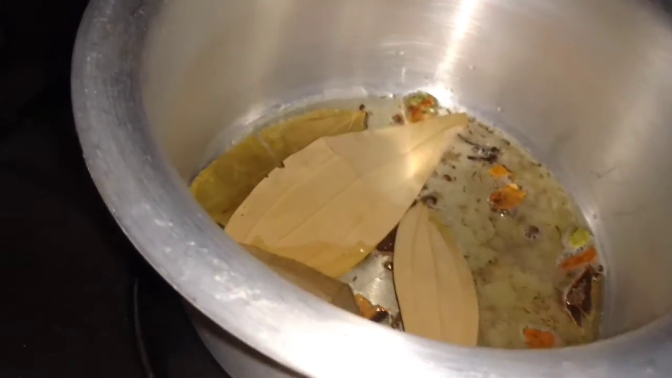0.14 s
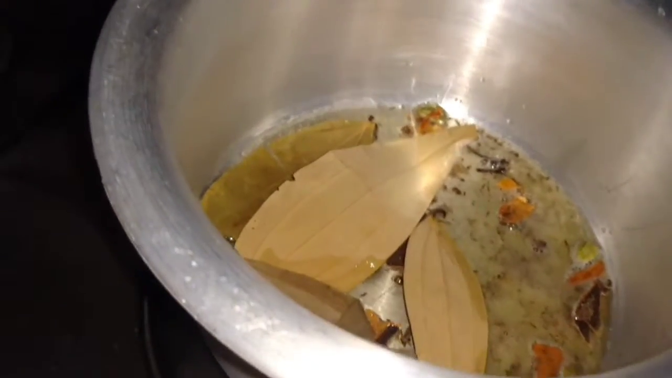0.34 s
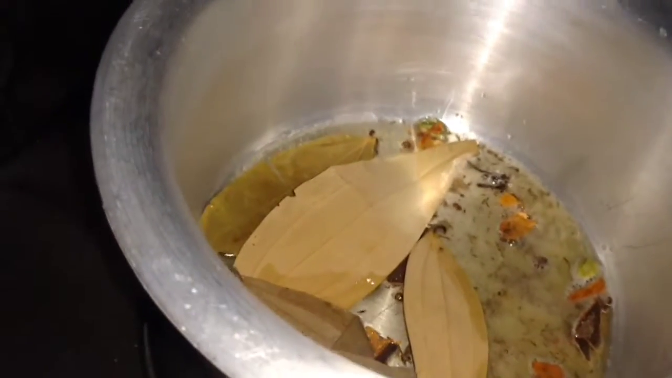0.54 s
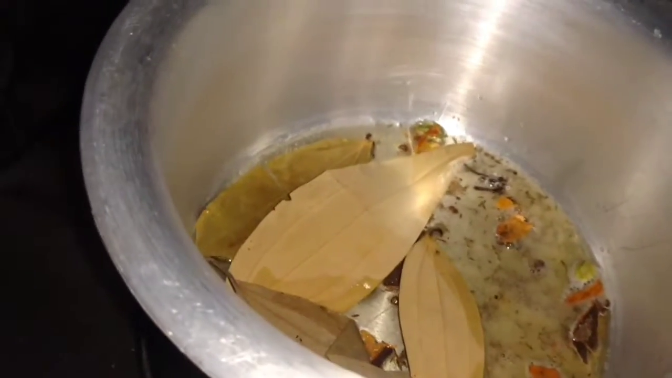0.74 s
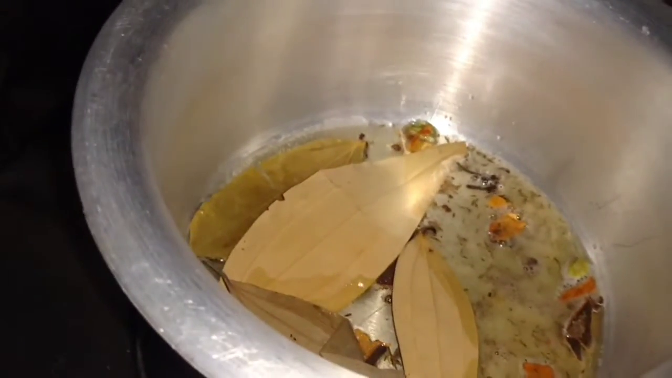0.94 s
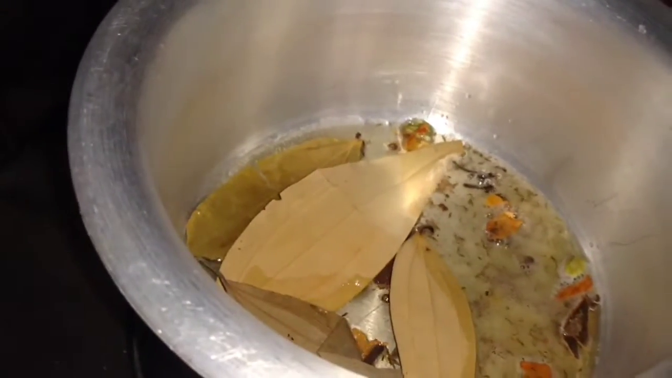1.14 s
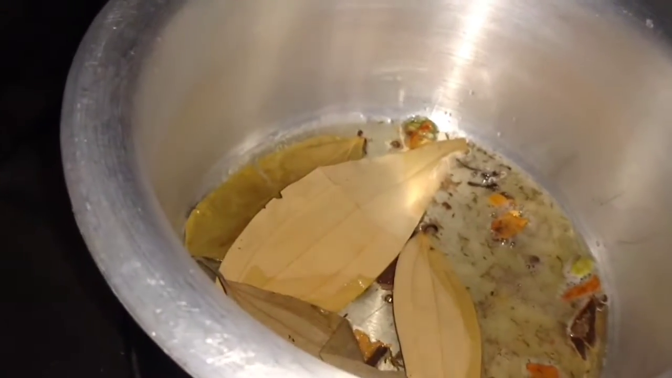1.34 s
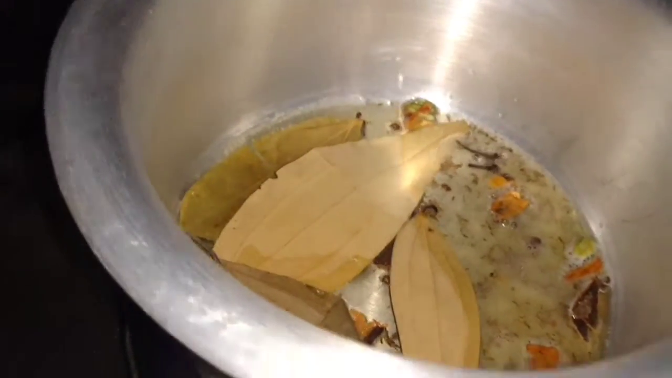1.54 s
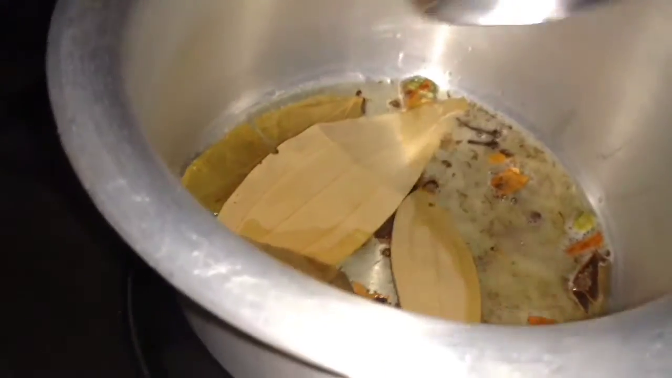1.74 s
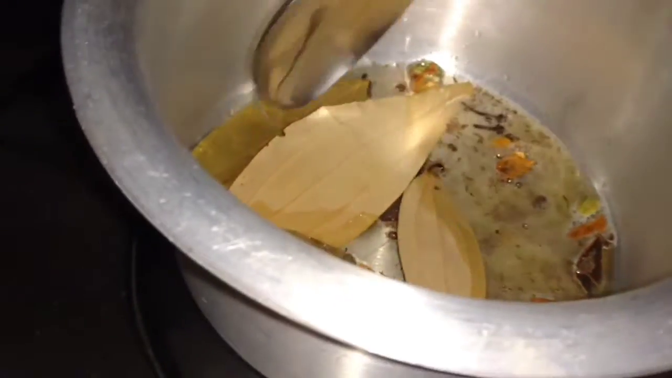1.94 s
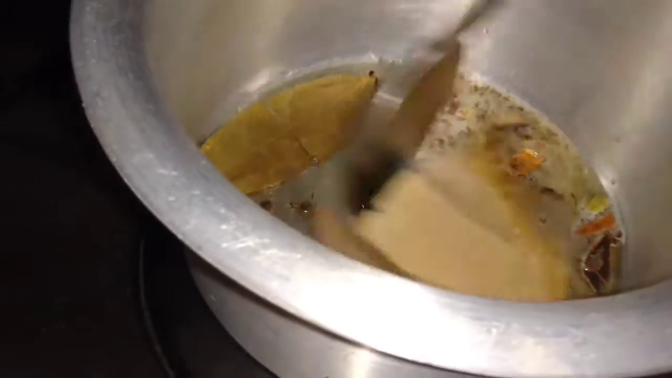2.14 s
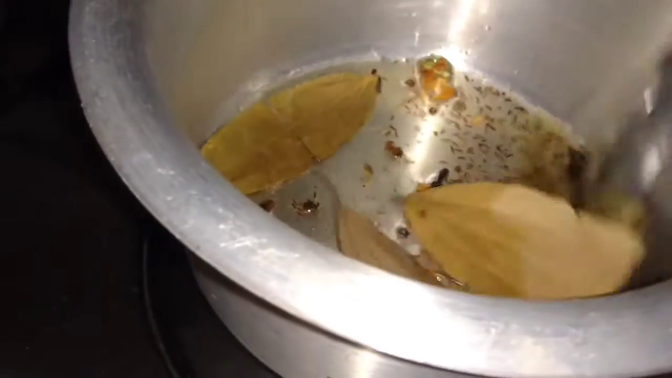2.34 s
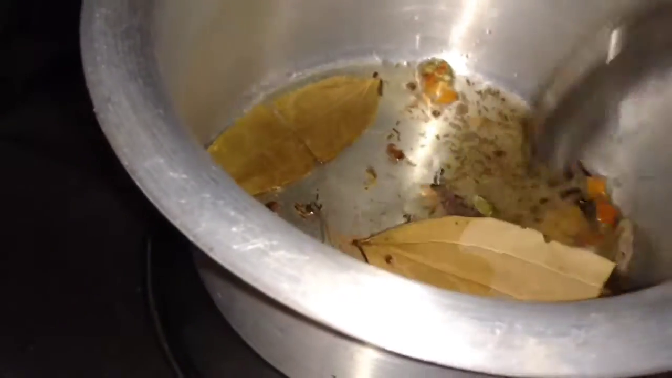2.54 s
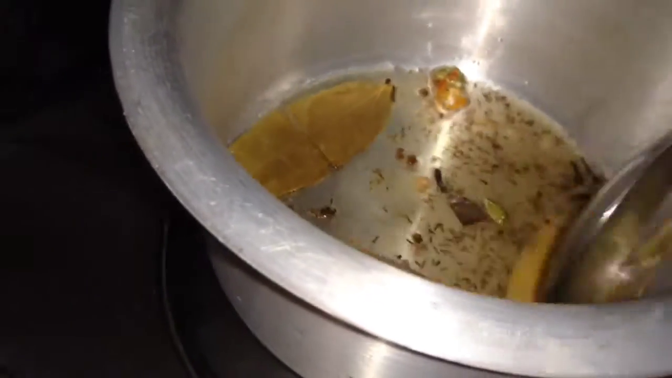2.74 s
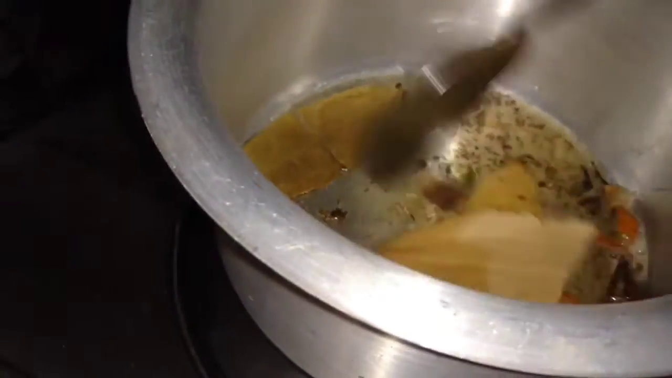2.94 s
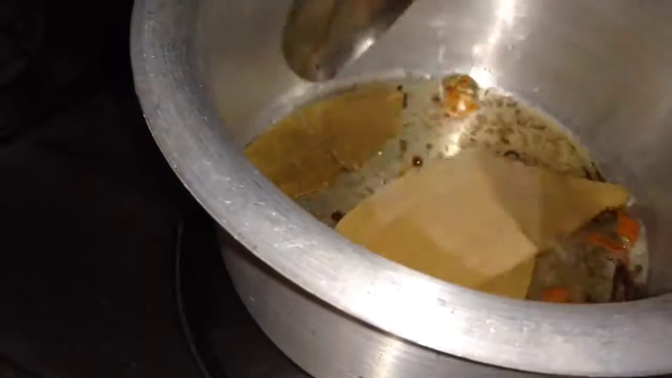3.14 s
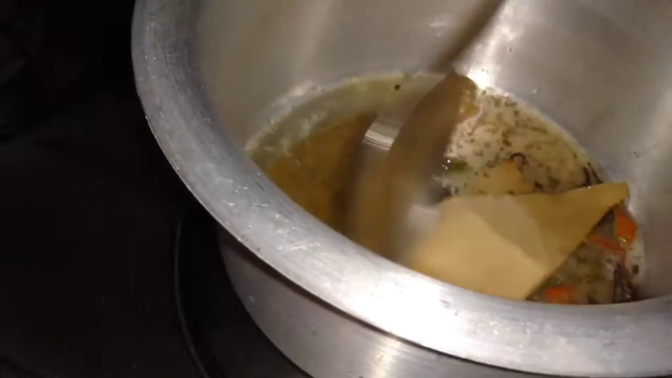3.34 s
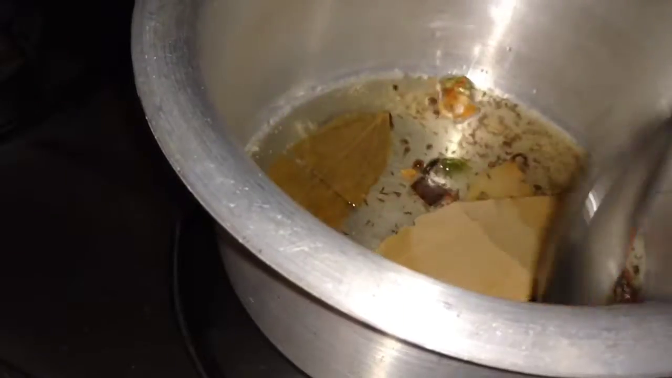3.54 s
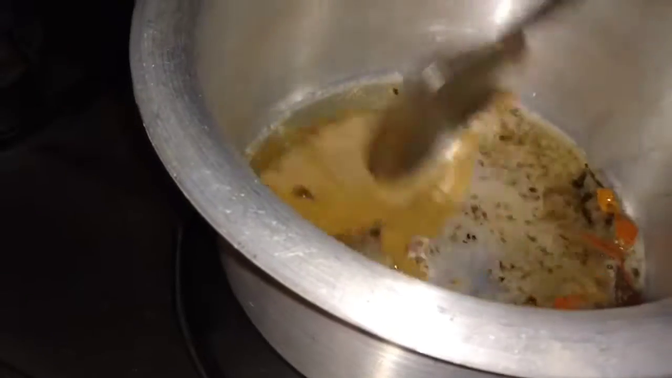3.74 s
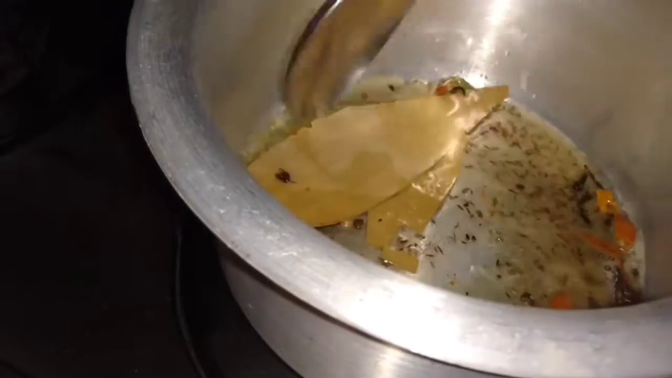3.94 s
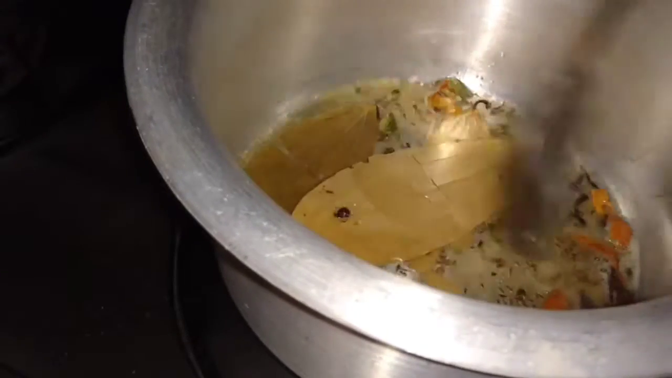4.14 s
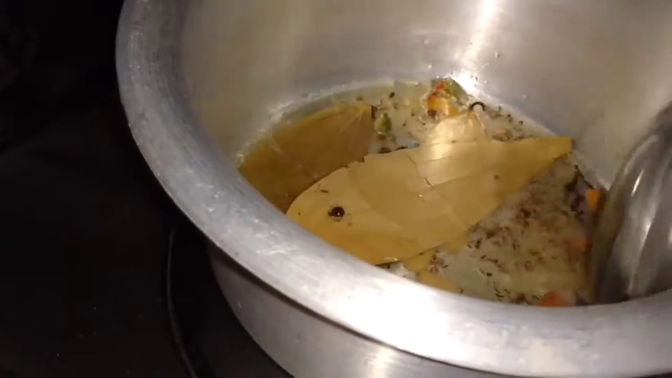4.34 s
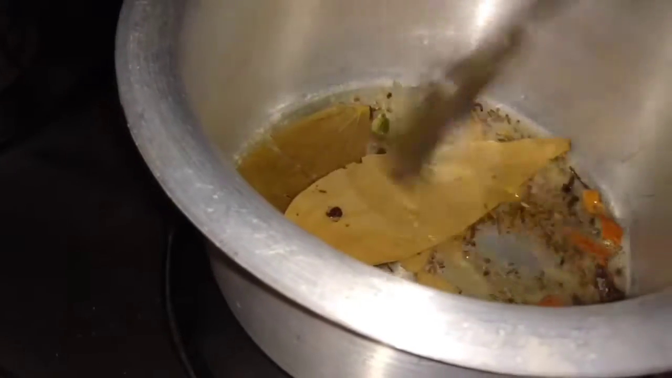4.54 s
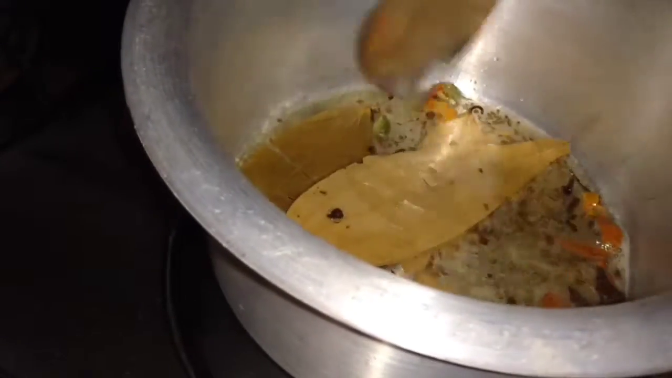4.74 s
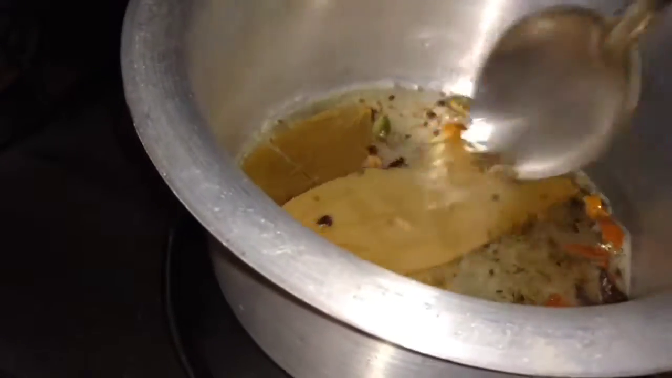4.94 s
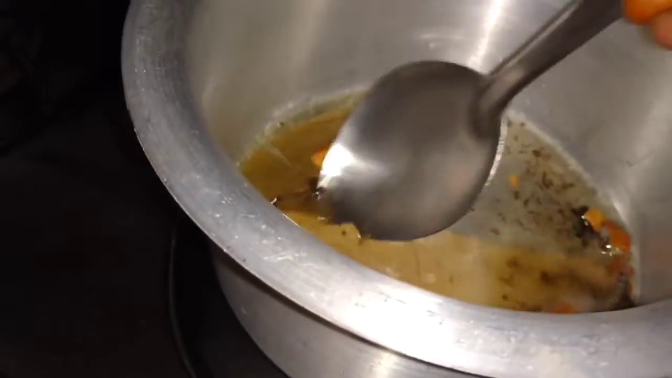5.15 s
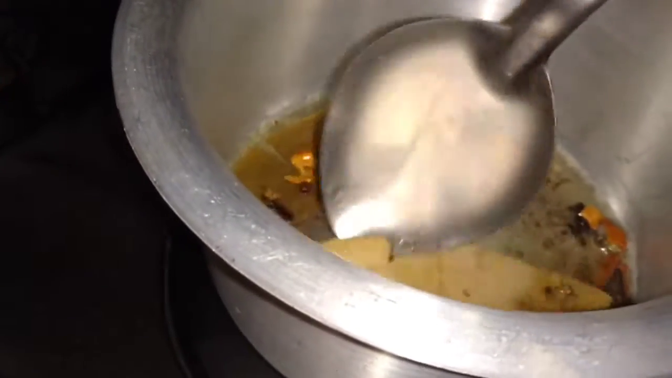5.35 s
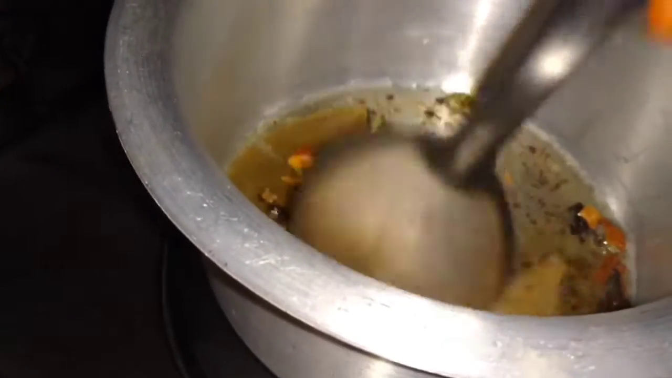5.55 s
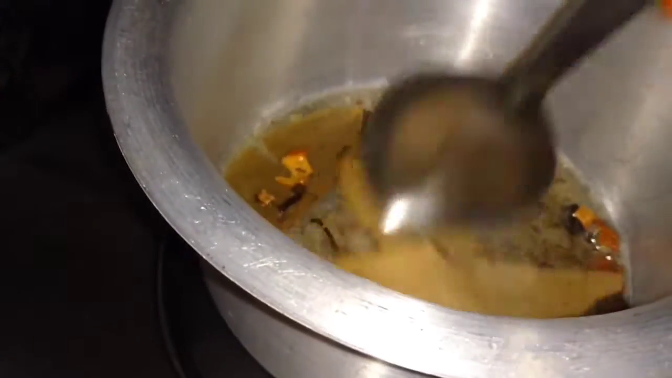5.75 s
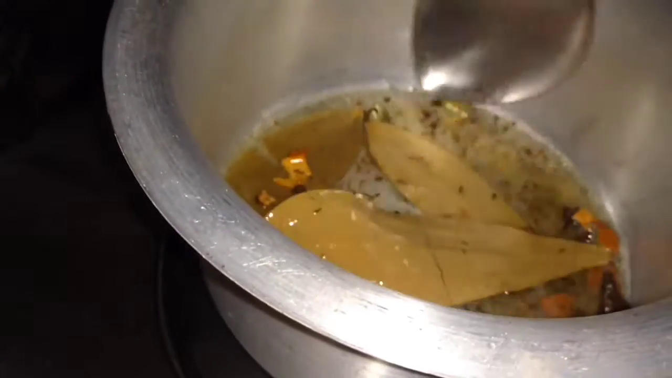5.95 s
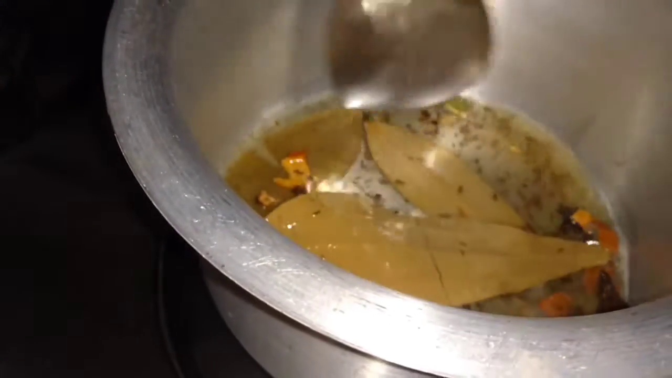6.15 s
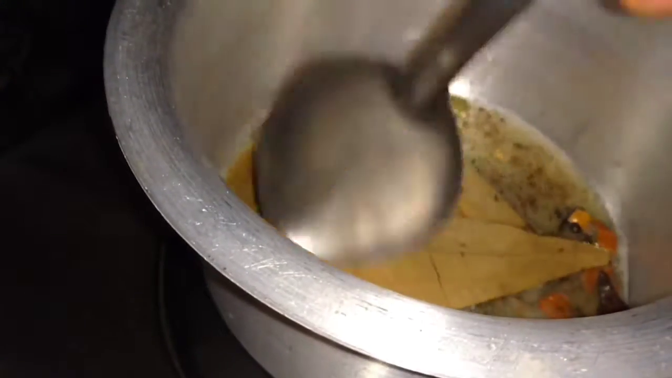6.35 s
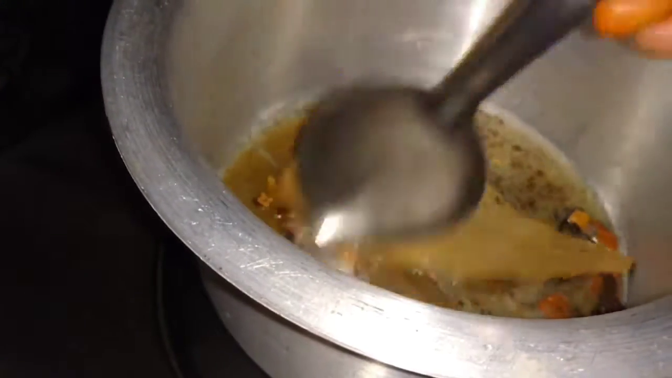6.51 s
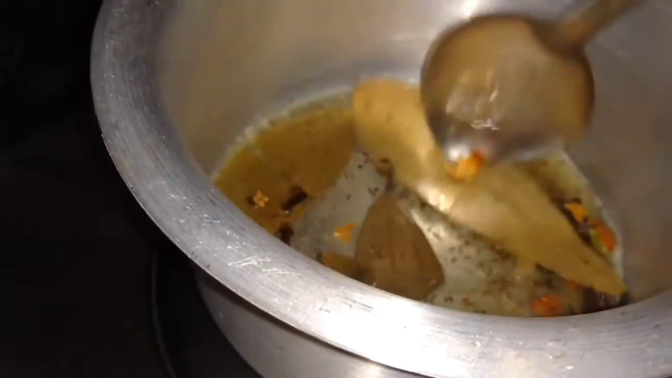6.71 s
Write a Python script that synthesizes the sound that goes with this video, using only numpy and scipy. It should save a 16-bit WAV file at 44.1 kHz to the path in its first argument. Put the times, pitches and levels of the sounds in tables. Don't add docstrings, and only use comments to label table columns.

```python
import sys
import numpy as np
from scipy import signal
from scipy.fft import rfft, irfft, next_fast_len
from scipy.io import wavfile
from scipy.ndimage import uniform_filter1d, minimum_filter1d, map_coordinates

SR = 44100
rng = np.random.default_rng(int(sys.argv[2]) if len(sys.argv) > 2 else 0)


def materialize(psi):
    bounded = np.clip(np.atleast_2d(psi).T, -1, 1)
    quanta = np.round(bounded * 32767).astype(np.int16)
    wavfile.write(sys.argv[1], SR, quanta)


def how_loud(loudness_db):
    steps = np.asarray(loudness_db, float) / 20
    return 10 ** steps


N = 298998

# (centre [Hz], width [Hz], level [dB])
FLOOR_MODES = [(291, 20, -22), (365, 40, -25), (448, 10, -12), (457, 3.5, -19), (468, 30, -4)]
# (centre [Hz], width [Hz], level [dB])
BOWL_MODES = [(563, 177, -1.5), (565.3, 53, 4), (628.5, 3.8, -11), (805, 150, -17.5)]
# (centre [Hz], width [Hz], level [dB])
WALL_MODES = [(893.6, 9.6, -4), (971, 29, -0.5), (1000, 36, -9.5), (1239, 112, 0), (1307, 45, 2.5),
              (1640, 180, -9.5), (1930, 71, -7), (2505, 250, 0)]
# (centre [Hz], width [Hz], level [dB])
EDGE_MODES = [(2420, 440, 1), (2764, 130, 0.5), (3587, 240, 6), (3670, 1010, 5), (5150, 1040, -1.5),
              (6100, 830, -5.5), (7200, 400, 1), (9000, 1100, -9.5), (12300, 7700, -16.5)]
PARTS = (FLOOR_MODES, BOWL_MODES, WALL_MODES, EDGE_MODES)
# (frequency [Hz], level [dB])
BODY_SHADOW = [(600, 0), (900, -2), (2000, 0), (4400, -4), (8200, -5), (9500, -2), (11000, 1.5), (15000, 2)]
PORT_SIDE = np.array([[0.5], [-0.5]])


def unit(x):
    return x / np.sqrt(np.mean(x ** 2) + 1e-20)


def along(points, hz):
    f, v = np.transpose(points)
    return np.interp(np.log(hz + 1), np.log(f + 1), v)


def curves(rows):
    s, *cols = np.transpose(rows)
    return np.array([np.interp(np.arange(N) / SR, s, c) for c in cols])


def wobble(rate_hz):
    knots = rng.standard_normal(int(N * rate_hz / SR) + 4)
    return map_coordinates(knots, [np.arange(N) * rate_hz / SR])


def filtered(x, response):
    m = next_fast_len(x.shape[-1] + 8192)
    return irfft(rfft(x, m) * response(np.fft.rfftfreq(m, 1 / SR)), m)[..., :x.shape[-1]]


def lowcut(f, hz):
    return (1j * f / (hz + 1j * f)) ** 2


def body(modes):
    def response(f):
        total = 0
        for k, (hz, width, db) in enumerate(modes):
            total = total + (-1) ** k * how_loud(db) * 1j * f * width / (hz * hz - f * f + 1j * f * width)
        return total
    return response


def add(track, s, piece):
    part = track[..., round(s * SR):][..., :piece.shape[-1]]
    part += piece[..., :part.shape[-1]]


def ports(pair, alike, gain):
    def mix(hz):
        turn = np.arccos(np.clip(along(alike, hz), 0, 1)) / 2
        return gain(hz) * np.array([np.cos(turn), np.sin(turn)])
    mid, side = filtered(pair, mix)
    return np.array([mid + side, mid - side])


def inside_pot(pair, wet_db):
    # (frequency [Hz], t60 [s])
    air_t60 = [(300, 0.09), (3000, 0.085), (12000, 0.011)]
    hz, t, z = signal.stft(rng.standard_normal((2, SR // 5)), SR, nperseg=128)
    decay = how_loud(-60 * t / along(air_t60, hz)[:, None])
    tail = signal.istft(z * decay, SR, nperseg=128)[1]
    tail = ports(tail, [(800, 0.4), (1800, 0.82)], lambda f: (f / (f + 1500)) ** 2)
    source = np.pad(pair.mean(0), (40, 0))[None]
    wet = signal.fftconvolve(source, tail / np.linalg.norm(tail[0]), axes=1)[:, :N]
    return pair + how_loud(wet_db) * wet


def rush(spectrum, grain_db, grain_hz):
    # (frequency [Hz], port likeness [0-1])
    likeness = [(60, 0.9), (400, 0.78), (1200, 0.042), (2000, 0.27), (15000, 0.18)]
    pair = rng.standard_normal((2, N)) * how_loud(grain_db * wobble(grain_hz))
    return unit(ports(pair, likeness, lambda hz: how_loud(along(spectrum, hz))))


def frying():
    # (time [s], level [dB])
    sizzle_levels = [(0.0, -53), (0.38, -51.5), (0.8, -45), (1.04, -50.5), (2.02, -45), (2.25, -56),
                     (2.74, -56.5), (3.08, -51), (3.74, -50), (4.2, -49.5), (4.38, -53.5), (4.55, -65.5),
                     (4.87, -65), (5.02, -54), (5.29, -58), (6.44, -49.5), (6.67, -45), (6.78, -40.5)]
    # (frequency [Hz], density [dB per Hz])
    fizz_spectrum = [(300, -30), (1500, -34), (2400, -1), (2900, -0.5), (4500, -5.5), (6500, -4),
                     (9000, -10), (12000, -13), (15300, -13.5), (16600, -45)]
    # (frequency [Hz], density [dB per Hz])
    burner_spectrum = [(120, -5.5), (220, -0.5), (350, 0.5), (450, -5), (600, -2), (900, -7), (1310, -2.5),
                       (1600, -7.5), (2500, -14), (5000, -38.5)]
    # (frequency [Hz], density [dB per Hz])
    rumble_spectrum = [(20, -38), (55, -6.5), (110, -2.5), (170, -3.5), (300, -40)]
    burner_db, burner_swing, rumble_db, rumble_swing = -4.5, 0.8, -11, 1.17
    swell_db = 1.2

    sizzle_db, = curves(sizzle_levels)
    mean_db = sizzle_db.mean()
    move_db = sizzle_db - mean_db
    sizzle = how_loud(sizzle_db + swell_db * wobble(8.3)) * rush(fizz_spectrum, grain_db=1.0, grain_hz=190)

    roar = rush(burner_spectrum, grain_db=swell_db / 2, grain_hz=8.8)
    roar = how_loud(mean_db + burner_swing * move_db + burner_db) * roar
    roar = roar + how_loud(-16.5) * np.std(roar) * unit(filtered(roar, body(WALL_MODES)))
    roar = roar + how_loud(-11.0) * np.std(roar) * unit(filtered(roar, body([(450, 7.9, 0)])))

    rumble = rush(rumble_spectrum, grain_db=3.5, grain_hz=7)
    return sizzle + roar + how_loud(mean_db + rumble_swing * move_db + rumble_db) * rumble


def pops():
    # (time [s], peak [dB], pitch [Hz], decay [cycles])
    bursts = [(0.0725, -16.5, 6250, 2.7), (0.3054, -32.5, 5340, 3.9), (0.4538, -24.5, 10300, 8.7),
              (0.4588, -29, 6100, 4.1), (0.6676, -20.5, 6570, 3.3), (0.6912, -23, 8900, 12.5),
              (1.0005, -26, 5560, 6.4), (1.1119, -23, 6430, 2.4), (1.333, -21.5, 6460, 2.4),
              (1.4356, -20, 6900, 1.1), (1.6823, -20, 5830, 4.3), (2.394, -32.5, 9000, 9),
              (2.428, -16, 5000, 1.3), (2.4893, -30.5, 6800, 1.8), (2.509, -33, 4120, 1.1),
              (2.9993, -27, 6100, 0.76), (3.3072, -22, 8700, 2.9), (3.3275, -15.5, 4840, 1.9),
              (3.569, -34, 5500, 1.6), (3.9586, -16, 6360, 6.9), (4.1692, -18.5, 5840, 7.8),
              (4.211, -24.5, 5300, 7.9), (4.6957, -60, 6330, 1.7), (4.81, -44, 6620, 1.6),
              (4.847, -26, 6700, 3.7), (5.523, -30.5, 8900, 2.4), (5.604, -32, 4600, 2.5),
              (5.6824, -29, 7060, 3.5), (6.054, -23, 6940, 4.7), (6.332, -34, 6570, 1.7),
              (2.1357, -9, 2830, 2.6), (1.527, -30, 3750, 1.6), (1.914, -30.5, 2930, 3.1),
             (2.547, -33.5, 3360, 3.2), (4.0299, -37, 3660, 4.3), (4.051, -28, 3080, 3.2),
             (4.1537, -26, 3600, 4.2), (4.1687, -20.5, 3620, 5), (4.1888, -34, 3560, 4),
             (4.5381, -45, 3600, 2.3), (4.5385, -49, 6200, 3), (5.893, -38, 2850, 4.4),
             (6.4178, -28, 3030, 6), (6.4427, -33, 2830, 12), (6.459, -31.5, 2960, 5.9),
             (6.6563, -32, 2920, 12), (6.676, -25, 3070, 5.5), (6.69, -30.5, 3040, 5.9),
             (6.7118, -30, 3080, 3.7), (6.7294, -25.5, 3120, 3.1),
              (0.2029, -79, 8690, 2),
        (0.565, -33.5, 10900, 8.9),
        (0.7667, -26.5, 10800, 6.2),
        (1.1707, -40, 9000, 3.2),
        (1.804, -31, 9400, 3.4),
        (1.847, -29, 9200, 3.8),
    ]
    out = np.zeros((2, N))
    for s, db, hz, cycles in bursts:
        lag_s = .35 / hz * rng.random((2, 1))
        t = np.maximum(np.arange(600) / SR - lag_s, 0)
        tone = np.sin(2 * np.pi * hz * t) * np.exp(-t * hz / max(cycles, .3)) * (1 - np.exp(-t * hz))
        click = .8 * rng.standard_normal(600) * np.exp(-t / .00025) * (t > 0)
        add(out, s, how_loud(db + 7.0) * (tone + click))
    return filtered(out, lambda f: lowcut(f, 1500) / (1 + 1j * f / 7800) ** 2)


def struck(modes, blows, crack_s, wash_s, low_hz, lasts_s):
    out, t = np.zeros((2, N)), np.arange(round(lasts_s * SR)) / SR
    for s, ring_db, crack_db, wash_db, damped_s in blows:
        touch_db = 60 * np.maximum(t + s - damped_s, 0) / 0.048
        ring = np.zeros((2, len(t)))
        for hz, db, t60, lead in modes:
            touch = 1 if hz > 700 else .015
            level_db = db - along(BODY_SHADOW, hz) * PORT_SIDE - 60 * t / t60 - touch * touch_db
            turns = hz * t + (hz > 2000) * rng.random() + lead * PORT_SIDE
            ring += how_loud(level_db) * np.sin(2 * np.pi * turns)
        crack = how_loud(crack_db - 60 * t / crack_s) * rng.standard_normal(len(t))
        wash = how_loud(wash_db - 60 * t / wash_s) * rng.standard_normal((2, len(t)))
        burst = filtered(crack + wash, lambda f: lowcut(f, low_hz) / (1 + 1j * f / 5000) ** 2)
        add(out, s, how_loud(ring_db) * ring + burst)
    return filtered(out, lambda f: lowcut(f, 150))


def rim_strike():
    # (frequency [Hz], level [dB], t60 [s], lead of first port [turns])
    strike_modes = [(624, -2, .7, -.03), (622.2, -17, 4, -.03), (620.2, -19, 1.4, .45), (1500, 19, .008, -.39),
                    (1460, 0, 1.07, -.32), (1942.5, -9, .75, .25), (1947.5, -11, .75, -.25),
                    (2218, -4, .78, .33), (2407, -16, .19, .05), (2541, 7, .65, -.06), (2989, -8, .6, -.36),
                    (3567, -24, .8, -.1), (3945, -9, .22, -.38), (4026, -2, .32, .36), (4114, -5, .22, .4),
                    (4252, -12, .55, .3), (4452, -13, .42, .02), (5039, -8, .35, .1), (5165, -22, .27, .15),
                    (5695, -5, .11, .28), (5735, -12, .4, -.23), (5918, -13, .32, .12), (6230, -18, .22, -.18),
                    (6583, -14, .3, -.28), (6896, -8, .22, .25), (7265, -17, .2, .3), (7518, -18, .3, .15),
                    (7950, -22, .35, -.2), (8653, -28, .3, .21), (11315, -38, .27, .05)]
    # (time [s], ring [dB], crack [dB], wash [dB], damped at [s])
    rim_blows = [
        (4.2499, -25.5, 6, -11, 4.858),
    ]
    return struck(strike_modes, rim_blows, crack_s=0.0035, wash_s=0.06, low_hz=450, lasts_s=1.6)


def spoon_pickup():
    # (frequency [Hz], level [dB], t60 [s], lead of first port [turns])
    spoon_modes = [(1270, -22, .15, -.14), (2090, -20, .08, .4), (2650, -14, .15, -.1), (2925, -6, .2, -.3),
                   (3512, -10, .14, .22), (3580, -22, .3, .3), (4840, 3, .09, -.2), (5130, -12, .1, -.1),
                   (5980, -13, .41, .17), (6310, -4, .08, .3), (6476, -2, .08, -.16), (6625, 3, .15, -.38),
                   (6827, -2, .17, .3), (6920, -10, .15, -.3), (7480, -7, .08, .15), (7798, -7, .25, .2),
                   (8392, 1, .11, .27), (9030, -5, .08, -.27), (10200, -2, .05, .02), (10722, -11, .1, .03),
                   (10922, -7, .11, -.14), (11498, -20, .1, .09), (12243, -15, .12, .1),
                   (12945, -9, .06, -.1), (13840, -18, .1, .3)]
    # (time [s], ring [dB], crack [dB], wash [dB], damped at [s])
    spoon_blows = [
        (0.8827, -24.5, -19, -20, 1.5),
        (.889, -49, -11.5, -29, 1.2),
        (1, -50, -37, -30.5, 1.2),
    ]
    return struck(spoon_modes, spoon_blows, crack_s=0.0043, wash_s=0.052, low_hz=1000, lasts_s=0.78)


def thuds():
    # (time [s], ring [dB], push [dB])
    jolts = [
        (2.135, -41, -14.5),
        (3.275, -35.5, -22),
        (3.719, -32, -53),
        (4.251, -66, -31),
        (4.433, -47.5, -55),
        (4.857, -40, -38),
        (5.05, -46, -55),
        (5.62, -46, -41),
        (5.66, -53, -59),
    ]
    stand_hz, stand_t60_s, push_s, rattle_rad = 294, 0.45, 0.0016, .045
    out, t = np.zeros(N), np.arange(SR // 3) / SR
    for s, ring_db, push_db in jolts:
        phase = 2 * np.pi * stand_hz * t + np.cumsum(rng.normal(0, rattle_rad, len(t)))
        ring = how_loud(ring_db - 60 * t / stand_t60_s) * np.sin(phase) * (1 - np.exp(-t / 0.0019))
        push = how_loud(push_db) * t / push_s * np.exp(1 - t / push_s) * (1 - t / (2 * push_s))
        add(out, s, ring + push)
    return out


def judders():
    # (time [s], length [s], level [dB], pitch [Hz])
    chatter = [(2.079, 0.011, -20, 3730), (2.111, 0.011, -21.5, 3900), (2.124, 0.01, -38, 3250),
               (3.332, 0.015, -36, 3980), (3.372, 0.028, -39, 4130), (3.682, 0.014, -42, 3160),
               (3.701, 0.011, -33.5, 4360), (3.747, 0.031, -35, 3800), (3.782, 0.038, -36.5, 3610),
               (4.08, 0.016, -38, 3450), (4.138, 0.017, -35, 3620), (4.922, 0.032, -52, 3670),
               (4.987, 0.045, -34, 3900), (4.998, 0.027, -35.5, 7200), (5.096, 0.022, -38, 3580),
               (5.097, 0.024, -39.5, 6900), (5.131, 0.014, -32.5, 3540), (5.197, 0.01, -38, 3640),
               (6.416, 0.076, -40.5, 2900), (6.492, 0.031, -35, 3330), (6.518, 0.007, -29, 4100),
               (6.525, 0.0074, -24, 3800), (6.532, 0.04, -32, 3700), (6.551, 0.0028, -34, 3500),
               (6.56, 0.0045, -23, 3500), (6.644, 0.0032, -34.5, 3420), (6.656, 0.0023, -20.5, 3240),
               (6.664, 0.066, -40.5, 3130), (.8, 0.096, -45.5, 2763), (.883, 0.013, -24, 6540),
               (5.568, 0.0048, -35.5, 6300), (5.573, 0.0029, -36, 2960), (0.897, 0.04, -39, 3600),
               (6.738, 0.0044, -34, 3570), (6.758, 0.022, -42, 3600)]
    spread = 0.079
    out, t = np.zeros(N), np.arange(SR // 8) / SR
    for s, length_s, db, hz in chatter:
        slip_db = 2.5 * rng.standard_normal(len(t) // 60 + 1).repeat(60)[:len(t)]
        slips = rng.standard_normal(len(t)) * how_loud(slip_db)
        fall_db = -60 * np.maximum(t - length_s, 0) / .014 - 3 * t / length_s
        shape = np.minimum(t / .001, 1) * how_loud(fall_db)
        note = signal.lfilter(*signal.iirpeak(hz, 1 / spread, SR), unit(slips) * shape)
        note = note / np.sqrt(np.sum(note ** 2) / np.sum(shape ** 2))
        add(out, s, how_loud(db - 2.0) * note)
    return out


def bongs():
    # (time [s], level [dB], pitch [Hz], t60 [s])
    contact_notes = [(2.134, -15, 474, 0.12), (2.1338, -5.5, 640, 0.016), (2.139, -27, 1231, 0.11),
                     (2.141, -35.5, 1314, 0.25), (2.084, -26.5, 1309, 0.059), (3.273, -19.5, 451, 0.13),
                     (3.274, -22.5, 548, 0.1), (3.277, -32, 1292, 0.054), (3.384, -41, 1290, 0.12),
                     (3.706, -9.5, 534, 0.028), (4.054, -35.5, 447, 0.15), (4.101, -28, 453.4, 0.33),
                     (4.03, -39, 1290, 0.033), (5.107, -35, 539, 0.11), (5.137, -25, 523, 0.061),
                     (5.202, -22.5, 555, 0.039), (6.757, -27, 457, 0.12), (4.857, -17.5, 1120, 0.01),
                     (5.1, -42, 621, 0.85), (6.656, -39.5, 1300, 0.053), (1.001, -53, 1243, 0.27),
                     (2.15, -26, 461.6, 0.48), (2.14, -18, 532, 0.07), (2.735, -35.5, 1270, 0.047),
                     (2.918, -35, 450, 0.19), (6.591, -30, 920, 0.018), (2.902, -43, 1260, 0.025),
                     (2.917, -38, 872, 0.018), (3.311, -32, 1140, .02), (3.339, -28, 900, 0.022),
                     (3.726, -28.5, 1000, 0.02), (4.11, -24.5, 903, 0.015), (4.86, -36.5, 623, 0.57),
                     (4.922, -34, 920, 0.069), (4.938, -39, 1310, 0.11), (4.995, -43.5, 1324, .15),
                     (5.096, -28, 1120, 0.024), (5.108, -33, 1120, .05), (5.147, -36.5, 1294, 0.081),
                     (5.205, -44.5, 1300, 0.1), (6.559, -28, 1960, 0.029), (.883, -30, 830, 0.026),
                     (2.77, -57, 630, 0.65)]
    out, t = np.zeros(N), np.arange(SR // 2) / SR
    for s, db, hz, t60 in contact_notes:
        add(out, s, how_loud(db - 60 * t / t60) * np.sin(2 * np.pi * hz * t) * (1 - np.exp(-t * hz)))
    return out


def knocks():
    # (time [s], floor [dB], bowl [dB], wall [dB], edge tick [dB])
    hits = [(0.963, -78, -69, -36.5, -42), (1.001, -74, -74, -41, -23), (2.081, -56, -53, -49, -15),
            (2.134, 9, -5.5, -15.5, -6.5), (2.735, -46, -67, -38, -40), (2.899, -39, -26.5, -46, -23),
            (2.918, -16, -36, -28.5, -49), (3.273, 0.5, -11, -17, -15.5), (3.383, -15, -17.5, -32, -29),
            (3.706, -18, -14, -25, -24), (4.029, -60, -60, -49, -22), (4.056, -14, -57, -72, -37),
            (4.102, -11, -42, -47, -20), (4.433, -42, -28, -42, -52), (4.857, -39, -17.5, -16.5, -14),
            (5.098, -54, -21, -39, -16.5), (5.137, -36, -49, -58, -37), (5.2, -59, -29, -46, -33),
            (5.617, -35, -51.5, -67, -34), (6.421, -25, -48, -32, -24), (6.656, -22, -35, -48, -19.5),
            (6.753, -24, -28, -37, -20)]
    out, t = np.zeros(N), np.arange(SR // 2) / SR
    for s, *levels_db in hits:
        for db, part in zip(levels_db, PARTS):
            for hz, width, mode_db in part:
                heard = t[:round(SR * 3 / width)]
                gain = how_loud(db + mode_db - 19.0 + rng.normal(0, 0.42))
                fade = np.exp(-np.pi * width * heard)
                add(out, s, gain * fade * np.sin(2 * np.pi * hz * heard * rng.normal(1, 0.011)))
    return filtered(out, lambda f: lowcut(f, 120))


def pushes():
    # (time [s], length [s], weight [dB], lean to the side [dB], rasp [dB])
    strokes = [(2.09, 0.056, -40, 7, -23), (2.141, 0.043, -20.5, -1, -50), (2.208, 0.1, -33.5, -14, -44.5),
               (2.739, 0.16, -56, 11, -44.5), (2.916, 0.095, -33, -24, -38.5),
               (3.296, 0.088, -26, -35, -33.5), (3.367, 0.042, -47, 10, -37), (3.689, 0.019, -49, 11, -32),
               (3.724, 0.072, -26.5, -33, -33.5), (3.768, 0.076, -36, -32, -33),
               (4.051, 0.028, -48, -1, -34), (4.104, 0.08, -28.5, -26, -33), (4.472, 0.11, -48, 13, -63),
               (4.866, 0.11, -41, 6, -40), (4.921, 0.26, -43, 18, -40), (4.999, 0.037, -37, 10, -33),
               (5.108, 0.043, -36.5, 4, -38.5), (5.136, 0.047, -37, 3, -33), (5.199, 0.076, -40.5, 11, -74),
               (5.558, 0.063, -63, 11, -34), (5.626, 0.013, -44, 4, -73), (5.744, 0.042, -38, -15, -35),
               (6.429, 0.19, -39.5, -14, -39.5), (6.502, 0.1, -37.5, 6, -26.5), (6.698, 0.11, -54, -1, -47),
               (6.756, 0.02, -38, -10, -24.5)]
    rise_s, fall_db, squareness = 0.013, 14.5, 0.96
    lead_s = .03
    out = np.zeros((4, N))
    t = np.arange(SR // 2) / SR - lead_s
    for s, length_s, weight_db, lean_db, rasp_db in strokes:
        shape_db = 20 * np.minimum(t, 0) / rise_s - fall_db * (np.maximum(t, 0) / length_s) ** squareness
        floor_db = weight_db - max(lean_db, 0)
        bowl_db = weight_db + min(lean_db, 0)
        wall_db = (weight_db + rasp_db) / 2 - 4.5 + 0.39 * lean_db
        add(out, s - lead_s, how_loud([[floor_db], [bowl_db], [wall_db], [rasp_db]]) * how_loud(shape_db))
    return out


def scraping():
    catch = how_loud(1.3 * wobble(70) + 3 * wobble(500))
    z = signal.stft(rng.standard_normal(N), nperseg=512)[2]
    shift = uniform_filter1d(rng.standard_normal(z.shape), size=4, axis=0)
    shift = unit(uniform_filter1d(shift, size=6, axis=1))
    grit = catch * signal.istft(z * how_loud(2 * shift), nperseg=512)[1][:N]
    dragged = [[(hz, width + 24, db) for hz, width, db in part] for part in PARTS]
    driven = [unit(filtered(grit, body(part))) for part in dragged]
    return how_loud(-4.0) * np.sum(pushes() * driven, 0)


def stirring():
    def round_phone(f):
        delay_s = .00003 * f / 1000 + .00005 / (1 + (f / 800) ** 2)
        return np.exp(2j * np.pi * f * PORT_SIDE * delay_s) / (1 + 1j * f / 12000) ** 2
    contact = scraping() + knocks() + thuds() + judders() + bongs()
    return inside_pot(filtered(contact, round_phone), wet_db=-1.0)


def scene():
    oil = frying() + inside_pot(pops(), wet_db=-8)
    return oil + rim_strike() + spoon_pickup() + stirring()


def thinned(pair):
    # (frequency [Hz], level [dB])
    masked_db = [(1000, -17), (2500, -11), (5000, -10), (7600, -12), (10000, -4), (12500, 0), (14000, -4),
                 (15000, -9)]
    # (frequency [Hz], level [dB])
    sparse_db = [(3000, -15), (9000, -22), (12000, 3), (15000, -0.5)]
    sum_diff = np.array([pair[0] + pair[1], pair[0] - pair[1]]) / 2
    hz, _, z = signal.stft(sum_diff, SR, nperseg=1536)
    energy = abs(z) ** 2
    band = np.where(hz < 5250, np.log(hz + 100) * 7.3 + .3, 57.56 + hz / 780).astype(int)
    bands = range(band.max() + 1)
    power = np.array([np.sum(energy[:, band == b], 1) for b in bands])[band].transpose(1, 0, 2)
    peak = np.array([np.max(energy[:, band == b], 1, initial=0) for b in bands])[band].transpose(1, 0, 2)

    drift_db = 6 * uniform_filter1d(rng.standard_normal((len(bands), z.shape[2])), 3)[band]
    limit = how_loud(2 * (along(masked_db, hz)[:, None] + drift_db))
    kept = (power > power[::-1] * limit) | (peak > .47 * power) | (hz < 1000)[:, None]

    treble = np.sum(energy[:, hz > 3000], (0, 1))
    click = treble > 2.2 * minimum_filter1d(treble, size=7)
    mean_power = power / np.bincount(band)[band][:, None]
    kept &= click | (energy > mean_power * how_loud(2 * along(sparse_db, hz)[:, None]))
    mid, side = signal.istft(z * kept, SR, nperseg=1536)[1][:, :N]
    return np.array([mid + side, mid - side])


def low_pass(x):
    return signal.sosfilt(signal.butter(12, 16650, fs=SR, output="sos"), x)


def record(dry):
    # (frequency [Hz], share [0-1])
    cross_share = [(500, .93), (2500, .95), (3800, .75), (5000, .56), (7600, .58), (10100, .78),
                   (12600, .75), (15000, .5)]
    # (frequency [Hz], level [dB])
    top_db = [(15400, 1), (15600, -15), (16500, -28), (16700, -90)]
    steer_s = 19 / 48000
    heard = filtered(dry, lambda f: how_loud(along(BODY_SHADOW, f) * PORT_SIDE))
    other = filtered(heard[::-1], lambda f: along(cross_share, f) * np.exp(-2j * np.pi * f * steer_s))
    steered = thinned(np.clip(heard - other, -1, 1))
    mix = np.clip(filtered(steered, lambda f: how_loud(along(top_db, f))), -1, 1)
    return low_pass(mix)


dry = scene()
out = record(dry)
materialize(out)
```